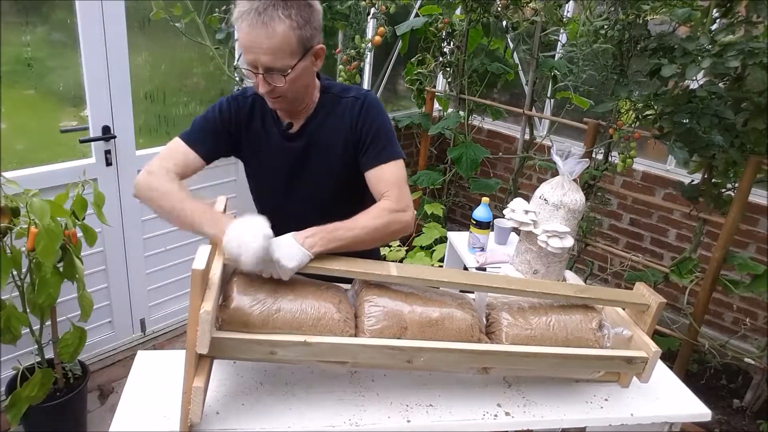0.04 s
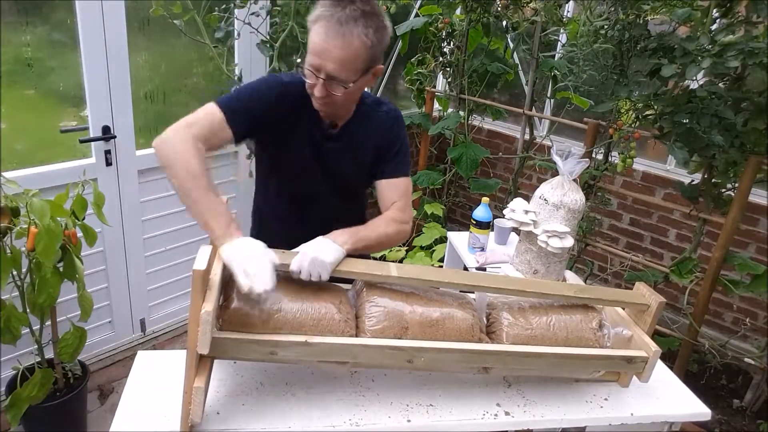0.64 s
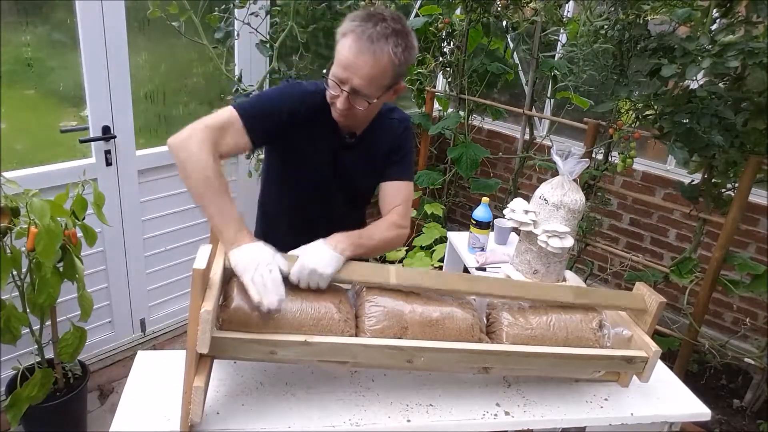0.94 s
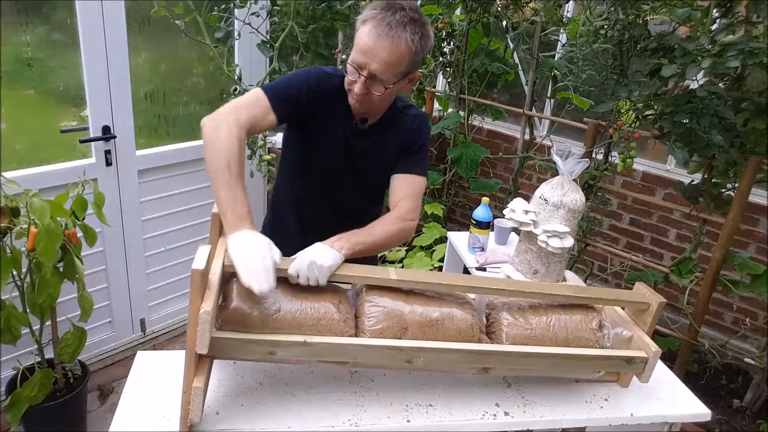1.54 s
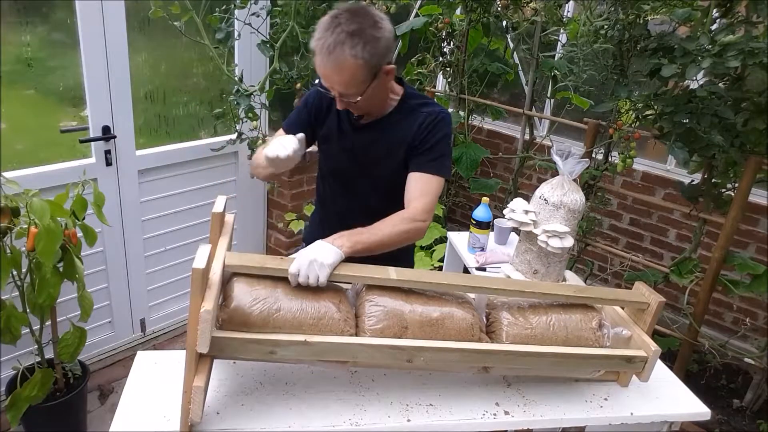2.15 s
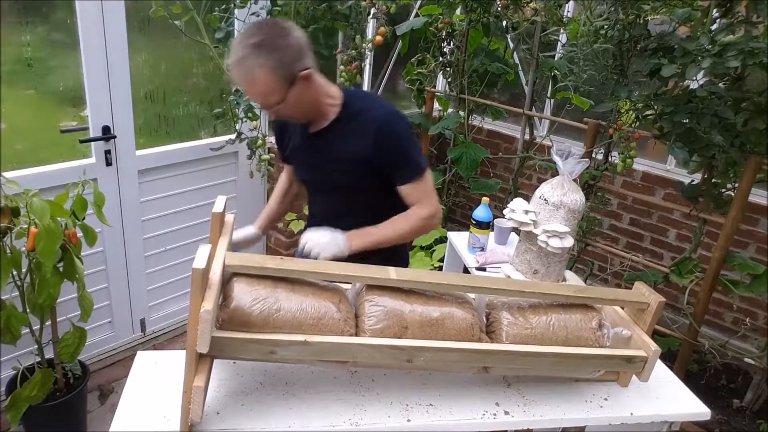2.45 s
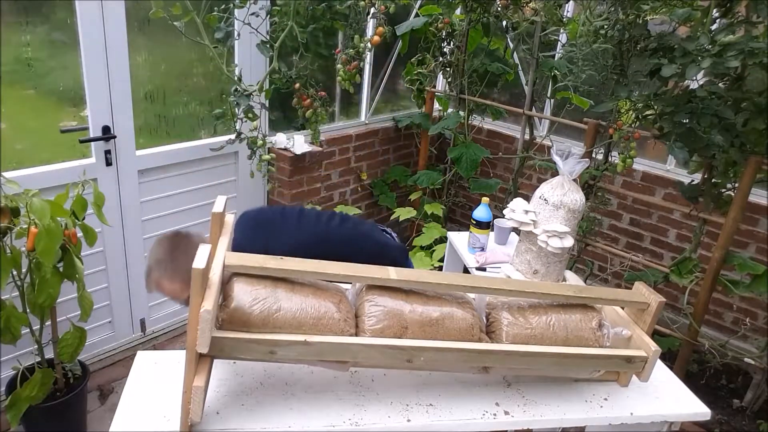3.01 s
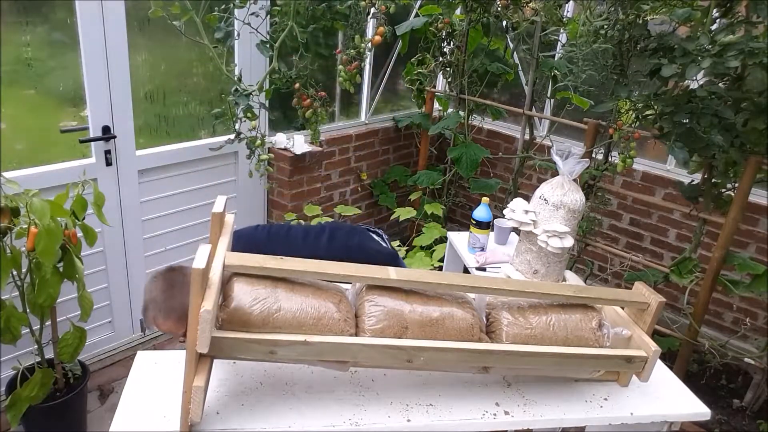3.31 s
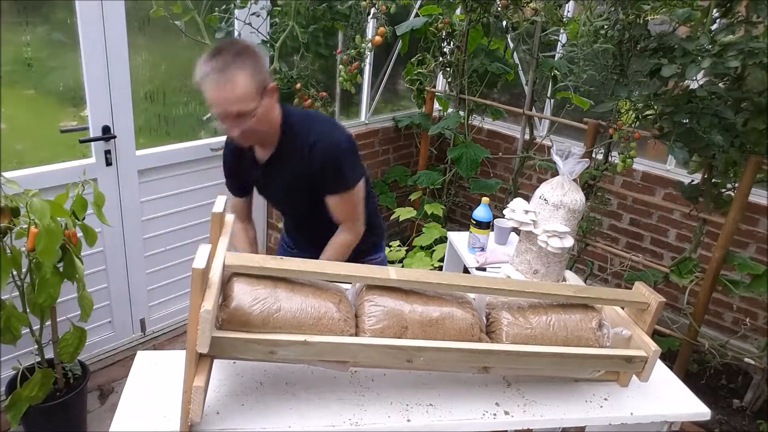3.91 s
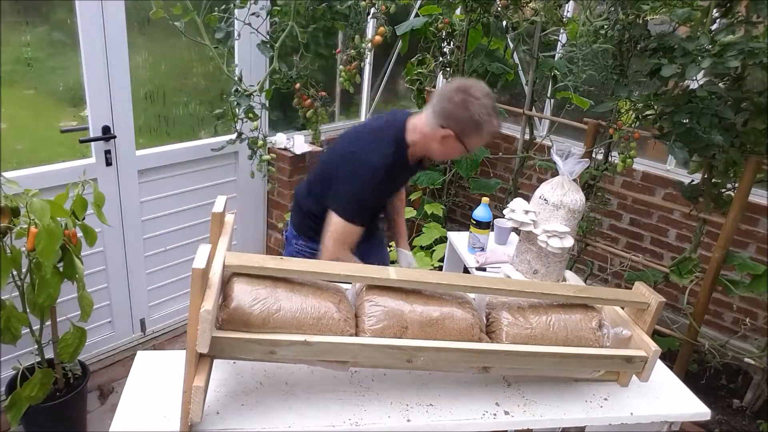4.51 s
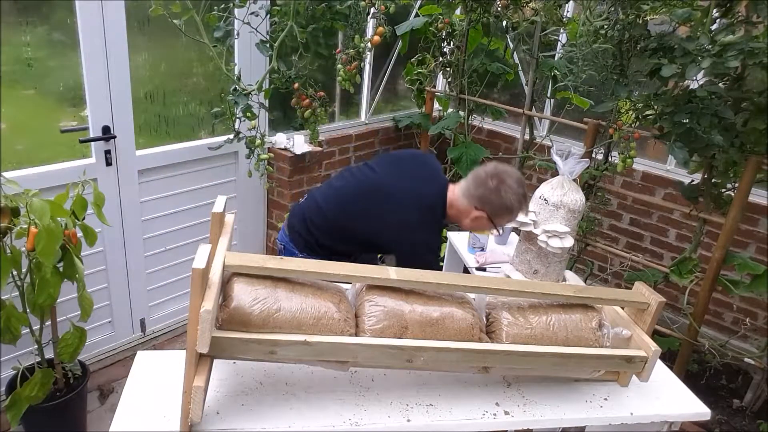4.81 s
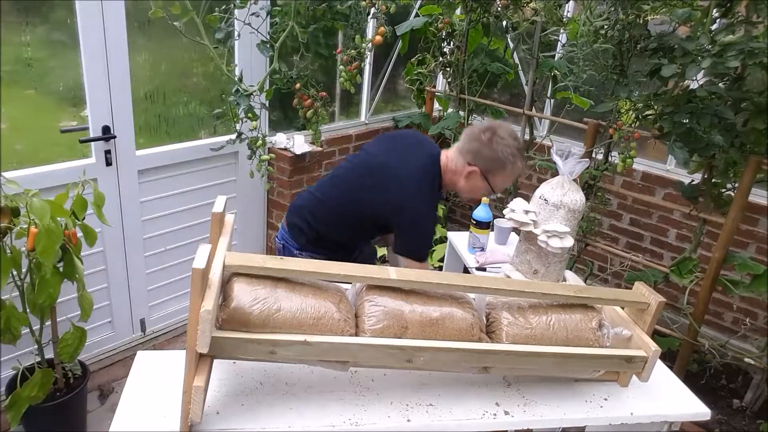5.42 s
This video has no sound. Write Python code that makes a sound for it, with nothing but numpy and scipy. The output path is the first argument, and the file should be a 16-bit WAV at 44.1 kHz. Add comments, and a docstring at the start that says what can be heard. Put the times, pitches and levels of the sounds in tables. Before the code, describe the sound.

Several quick, hollow knocks on wood ring in a greenhouse, then clothes rustle and things are moved with light bumps and a scrape.

```python
"""The ring of an earlier knock fades on a wooden frame on a table in a small, ringing greenhouse.
Until about 2 s a gloved hand knocks, ringing wood and room, among dry ticks and light clicks.
The glove then slides off; clothes and shoes shuffle as the worker bends down.
From 3.4 s things are moved beside the table: faint bumps, a metal chink (4.9 s),
a double bump (5.2 s), last a scrape and a bright clack (5.5 s)."""
import sys
import numpy as np
from scipy import signal
from scipy.fft import irfft, next_fast_len
from scipy.io import wavfile

SR = 44100
rng = np.random.default_rng(int(sys.argv[2]) if len(sys.argv) > 2 else 0)


def dump(signal):
    """Clip the signal to [-1, 1] and save it as 16-bit WAV at the path in sys.argv[1]."""
    limited = np.clip(np.atleast_2d(signal).T, -1, 1)
    pcm = np.round(limited * 32767).astype(np.int16)
    wavfile.write(sys.argv[1], SR, pcm)


N = 249606
TIME = np.arange(N) / SR


def from_db(db):
    return 10 ** (np.asarray(db) / 20)


def unit_rms(x):
    return x / np.sqrt(np.mean(x ** 2) + 1e-20)


def at_hz(points, hz):
    """Table lookup on a log-frequency axis."""
    f, value = np.transpose(points)
    return np.interp(np.log(hz + 1e-6), np.log(f), value)


def add(track, start_s, sound):
    i = int(np.clip(start_s * SR, 0, N - 1))
    track[i:i + len(sound)] += sound[:N - i]


def decay(t60_s, size):
    return np.exp(-np.log(1000) / max(t60_s, 1e-3) * TIME[:size])


def burst(t60_s, rise_s, size):
    """Rise and decay, unit energy."""
    envelope = decay(t60_s, size) * (1 - np.exp(-TIME[:size] / max(rise_s, 1e-5)))
    return envelope / np.sqrt(np.sum(envelope ** 2))


def swell(peak_s, length_s, rise_share, sharpness):
    """Envelope: a triangle raised to a power."""
    start_s = peak_s - rise_share * length_s
    return np.interp(TIME, [start_s, peak_s, start_s + length_s], [0, 1, 0]) ** sharpness


def flutter(rate_hz, depth_db):
    """Randomly wandering gain."""
    knots = rng.standard_normal(2000)
    return from_db(depth_db * np.interp(TIME * rate_hz, np.arange(len(knots)), knots))


def noise(colour_db, size):
    """Unit-RMS noise with spectrum colour_db(hz)."""
    hz = np.fft.rfftfreq(size, 1 / SR) + 1
    phases = np.exp(2j * np.pi * rng.random(len(hz)))
    return unit_rms(irfft(from_db(colour_db(hz)) * phases, size))


def shaped_noise(spectrum):
    return noise(lambda hz: at_hz(spectrum, hz), N)


def resonant_noise(centre_hz, width_oct, size, top_hz=11500):
    """Noise in one resonance, rolled off at the top."""
    def colour_db(hz):
        resonance_db = -25 * np.log10(1 + (np.log2(hz / centre_hz) / width_oct) ** 2 / 3)
        return resonance_db - 10 * np.log10(1 + (hz / top_hz) ** 6)
    return noise(colour_db, size)


def noise_bands(size, count=26):
    """Yields (centre Hz, noise), each band with a unit click's power there."""
    edges_hz = np.geomspace(25, 16500, count + 1)
    white = rng.standard_normal((2, size))
    for k, (low, high) in enumerate(zip(edges_hz, edges_hz[1:])):
        band = signal.sosfilt(signal.butter(2, [low, high], "band", fs=SR, output="sos"), white[k % 2])
        yield np.sqrt(low * high), unit_rms(band) * np.sqrt(2 * (high - low) / SR)


# still air: f/Hz, relative density/dB
AIR_SPECTRUM = [(15, -28.5), (25, 4), (102, -9), (149, 1.5), (190, -10.5), (439, -9), (2280, -18),
                (7110, -19.5), (8830, -26.5), (14800, -22.5), (16000, -39.5)]
def still_air(level_db=-58.5):
    """Steady noise floor."""
    return from_db(level_db) * shaped_noise(AIR_SPECTRUM)


# fading ring of an earlier knock, then strokes of the glove and of dragged things:
# peak t/s, length/s, level/dB, f/Hz, width/oct
TAIL_AND_STROKES = [(0.01, 0.13, -42, 770, 0.47), (0.697, 0.3, -46, 7670, .25), (0.72, 0.3, -45, 1795, .42),
                    (1.838, 0.091, -36.5, 2000, 0.57), (2.423, 0.78, -48, 6540, 0.54),
                    (2.44, .58, -45.5, 2150, 0.33), (2.828, 0.31, -55.5, 1600, .8),
                    (3.323, 0.41, -53, 990, 1.1), (5.443, 0.35, -39.5, 4360, 0.5),
                    (5.458, 0.46, -38, 580, 0.98)]
def knock_tail_and_rubs():
    """A knock's tail fades; then friction swells and fades with each stroke, catching unevenly."""
    out = np.zeros(N)
    for peak_s, length_s, db, hz, width_oct in TAIL_AND_STROKES:
        envelope = from_db(db) * swell(peak_s, length_s, rise_share=0.47, sharpness=2.02)
        out += envelope * resonant_noise(hz, width_oct, next_fast_len(N))[:N]
    return out * flutter(rate_hz=310, depth_db=2)


# room decay: f/Hz, t60/s
ECHO_DECAY = [(80, 0.83), (250, 0.6), (1000, .5), (3000, 0.42), (7500, 0.39), (15000, 0.28)]
# room echo: f/Hz, level/dB
ECHO_LEVEL = [(40, -10), (110, -4), (170, 0), (400, 0.5), (1000, 1), (2500, -2), (7000, -1), (15000, -11)]
def echo(hz, size, build_s=0.0056):
    """Envelope of the diffuse tail off glass and brick at one frequency."""
    return from_db(at_hz(ECHO_LEVEL, hz)) * burst(at_hz(ECHO_DECAY, hz), build_s, size)


def greenhouse(x, wet_db=-5, size=24000):
    """Direct sound plus diffuse tail."""
    tail = sum(band * echo(hz, size) for hz, band in noise_bands(size))
    return x + from_db(wet_db) * signal.fftconvolve(x, tail)[:N]


def pings(events, size=2048):
    """Band-limited damped sines from rows of t/s, level/dB, f/Hz, t60/s."""
    out = np.zeros(N)
    for start_s, db, hz, t60_s in events:
        add(out, start_s, from_db(db) * np.sin(2 * np.pi * hz * TIME[:size]) * decay(t60_s, size))
    thin = signal.sosfilt(signal.butter(2, 1200, "high", fs=SR, output="sos"), out + 1e-18)
    return signal.sosfilt(signal.butter(4, 9000, fs=SR, output="sos"), thin)


# close ticks: t/s, level/dB, f/Hz, release re catch/dB
TICK_PAIRS = [(0.141, -28.5, 4870, 2), (0.1817, -22, 5760, -21), (0.474, -19, 4900, -1),
              (1.083, -16.5, 5200, -3), (4.05, -27.5, 1375, -9.5), (4.0786, -17, 6800, -4)]
def ticks(release_s=0.003, t60_cycles=11.5):
    """Catch and release, too near and faint to excite the room."""
    return pings((start_s + k * release_s, db + k * release_db, hz, t60_cycles / hz)
                 for start_s, db, hz, release_db in TICK_PAIRS for k in (0, 1))


def contact_force(db, weight_db, cutoff_hz, weight_below_hz=585, slope_db_per_oct=11):
    """Blow spectrum (f/Hz, level/dB): weight sets the lows, a soft contact loses the highs."""
    hz = np.geomspace(220, 5500, 12)
    lows_db = weight_db / (1 + (hz / weight_below_hz) ** 3)
    loss_db = slope_db_per_oct * np.log2(1 + (hz / cutoff_hz) ** 4) / 4
    return np.transpose([hz, db + lows_db - loss_db])


# dense weak modes of the frame: f/Hz, density/dB
CRACK_SPECTRUM = [(40, 49.4), (105, 43.6), (160, 42.3), (250, 42.9), (450, 45.2), (700, 43.53),
                  (1200, 35.44), (2000, 33.76), (3000, 27.55), (5000, 24.4), (7400, 28.5), (10000, 19.4),
                  (15000, 9.5)]
# their decay: f/Hz, t60/s
CRACK_DECAY = [(50, 0.29), (300, 0.08), (1500, 0.066), (3000, 0.047), (6000, 0.022)]
def wood_crack(force, boom_hz, give_s, boom_db=7, boom_oct=0.42, stiff_hz=1500, size=24000, direct=6000):
    """Dense modes and their room tail; the struck spot favours one low band."""
    out = np.zeros(size)
    for hz, band in noise_bands(size):
        lift_db = boom_db * np.exp(-(np.log2(hz / boom_hz) / boom_oct) ** 2)
        rise_s = give_s / (1 + (hz / stiff_hz) ** 2)  # highs at once, lows as the wood gives
        power = echo(hz, size) ** 2
        power[:direct] += burst(at_hz(CRACK_DECAY, hz), rise_s, direct) ** 2
        out += from_db(at_hz(force, hz) + at_hz(CRACK_SPECTRUM, hz) + lift_db) * band * np.sqrt(power)
    return out


def ringing(modes, force, rise_s, size):
    """Damped sines, each driven by the force at its frequency."""
    t = TIME[:size]
    tones = np.zeros(size)
    for hz, db, t60_s in modes:
        sine = np.sin(2 * np.pi * (hz * t + rng.random()))
        tones += from_db(at_hz(force, hz) + db) * sine * decay(t60_s, size)
    return tones * (1 - np.exp(-t / rise_s))


# main modes of the frame: f/Hz, level/dB, t60/s
FRAME_MODES = [(223, 0, 0.037), (272, 0, 0.047), (341, -3, 0.1), (488, -5, 0.063), (565, -5, 0.06),
               (785, -4.5, 0.05), (945, -2.5, 0.054), (1120, -7, 0.022), (1407, -6, 0.025),
               (1715, -9, 0.046), (1942, -10, 0.08), (2110, -7.5, 0.11), (2580, -6.5, .025)]
def frame_ring(force, give_s, gain_db=-2.5):
    """The main modes build up as the wood gives."""
    return from_db(gain_db) * ringing(FRAME_MODES, force, give_s, size=6000)


def frame_resonance(cracks, gain_db=-1):
    """The main modes colour the cracks, tails included."""
    out = np.zeros(N)
    for hz, db, t60_s in FRAME_MODES:
        q = np.pi * hz * t60_s / np.log(1000)
        out += from_db(db) * signal.lfilter(*signal.iirpeak(hz, q, fs=SR), cracks + 1e-18)
    return from_db(gain_db) * out


# greenhouse modes: f/Hz, level/dB, t60/s
ROOM_MODES = [(79, -14, 0.74), (155.05, 0.5, 0.43), (207.2, -5, 0.41), (231.8, -11, .58),
              (264.5, -7.5, 0.66), (346.7, -6, 0.51), (431, -11, 0.28), (483.4, -13, 0.62)]
def standing_waves(force):
    """Low room tones ring on after a blow."""
    return ringing(ROOM_MODES, force, rise_s=0.0075, size=24000)


# hand on the frame: t/s, level/dB, weight/dB, cutoff/Hz, boom/Hz, give/s
HAND_KNOCKS = [(0.2201, -21, 0, 4000, 160, 0.0058), (0.4873, -21, 2, 2860, 186, 0.0015),
               (0.802, -10.5, -5.5, 6960, 238, 0.00091), (0.899, -25.5, -7.5, 5340, 293, 0.0014),
               (1.1221, -8, -5.5, 3780, 316, 0.00052), (1.646, -18, -10.5, 3820, 254, .009),
               (1.811, -36, -9.5, 3000, 406, .001), (2.033, -25.5, -6.5, 3900, 150, 0.0048)]
# things bumped beside the frame: t/s, level/dB, cutoff/Hz, boom/Hz
SIDE_BUMPS = [(3.41, -46, 1400, 257), (3.79, -51.5, 903, 303), (4.195, -42.5, 583, 431),
              (5.214, -22.5, 590, 250), (5.2628, -28, 5300, 256)]
def blows(knock_ring_db=0.9, bump_ring_db=-3.5, bump_weight_db=-5.5, bump_give_s=0.0035):
    """Each blow cracks and rings frame and room; bumps ring them less."""
    knocks = [(start_s, contact_force(db, weight_db, cutoff_hz), boom_hz, give_s, knock_ring_db)
              for start_s, db, weight_db, cutoff_hz, boom_hz, give_s in HAND_KNOCKS]
    bumps = [(start_s, contact_force(db, bump_weight_db, cutoff_hz), boom_hz, bump_give_s, bump_ring_db)
             for start_s, db, cutoff_hz, boom_hz in SIDE_BUMPS]
    cracks, tones = np.zeros((2, N))
    for start_s, force, boom_hz, give_s, ring_db in knocks + bumps:
        add(cracks, start_s, wood_crack(force, boom_hz, give_s))
        add(tones, start_s, from_db(ring_db) * frame_ring(force, give_s))
        add(tones, start_s, from_db(ring_db) * standing_waves(force))
    return cracks + frame_resonance(cracks) + tones


# small hard things touched and set down: t/s, level/dB, f/Hz, width/oct, t60/s
HARD_CONTACTS = [(0.4862, -18, 6400, 0.27, 0.02), (0.642, -29.5, 9000, 2.3, 0.01),
                 (0.6523, -26.5, 8000, 1.3, 0.013), (2.76, -44.5, 6700, .5, 0.039),
                 (2.781, -32.5, 5100, 0.31, 0.044), (3.029, -46, 4360, 0.47, .02),
                 (3.342, -35.5, 5270, 0.32, .041), (3.41, -37.5, 4940, 0.74, .078),
                 (3.756, -43.5, 3930, 0.29, 0.051), (4.337, -41, 7400, 0.23, .012),
                 (4.848, -44, 6990, 0.24, .02), (5.093, -39.5, 4340, 0.49, 0.031),
                 (5.465, -19, 3890, 0.26, 0.089), (5.467, -23, 6820, 0.12, .095)]
def clicks(echo_db=-6, size=16384):
    """A short burst in one resonance, then its room tail."""
    out = np.zeros(N)
    for start_s, db, hz, width_oct, t60_s in HARD_CONTACTS:
        direct = decay(t60_s, size)
        tail = from_db(echo_db) * np.sqrt(np.sum(direct ** 2)) * echo(hz, size)
        add(out, start_s, from_db(db) * resonant_noise(hz, width_oct, size) * np.hypot(direct, tail))
    return out


# footing, shuffling, cloth: f/Hz, relative density/dB
FEET_SPECTRUM = [(25, 5.5), (70, 4), (130, -7.5), (250, -40)]
SHUFFLE_SPECTRUM = [(90, -7), (160, -8.5), (230, 4), (340, 0.5), (520, -1.5), (1100, -8.5), (2300, -13),
                    (3500, -35), (7000, -33.5)]
CLOTH_SPECTRUM = [(1500, -42.5), (3500, 10.5), (5500, 7.5), (7500, 13.5), (10000, -17), (16000, -29)]
# worker lets go, bends, reaches, rises, steps, bends: peak t/s, length/s, effort/dB, feet/dB, cloth/dB
BODY_MOVES = [(2.377, 0.56, -38.5, -14, -1), (2.815, 0.28, -49.5, -2, -3), (3.061, 0.15, -54.5, -1.5, -2),
              (3.36, 0.35, -50.5, -12, -1), (3.804, 0.25, -50.5, 0.5, -12), (4.371, 0.46, -49, 5.5, -3.5),
              (4.686, 0.24, -63.5, -11, 10), (4.903, 0.17, -48.5, -22, 1), (5.104, 0.21, -54, -13, 5)]
def shoes_and_clothes(shuffle_gain_db=-2.5, cloth_gain_db=-8, feet_lead_s=0.076):
    """One swell of effort drives each move; the weight shifts before the body follows."""
    feet, shuffle, cloth = np.zeros((3, N))
    for peak_s, length_s, db, feet_db, cloth_db in BODY_MOVES:
        effort = from_db(db) * swell(peak_s, length_s, rise_share=0.42, sharpness=0.83)
        feet += from_db(feet_db) * np.interp(TIME + feet_lead_s, TIME, effort)
        shuffle += effort
        cloth += from_db(cloth_db) * effort
    feet *= shaped_noise(FEET_SPECTRUM)
    shuffle *= from_db(shuffle_gain_db) * shaped_noise(SHUFFLE_SPECTRUM)
    shuffle *= flutter(rate_hz=58, depth_db=4)
    cloth *= from_db(cloth_gain_db) * shaped_noise(CLOTH_SPECTRUM)
    return feet + shuffle + cloth


def metal_chink(start_s=4.902, db=-24.5, hz=7450, t60_s=0.0047, bounce_s=0.014, loss_db=2):
    """A small metal piece chatters and settles."""
    return pings((start_s + k * bounce_s, db - k * loss_db, hz, t60_s) for k in range(3))


def scene():
    """All sources reach one point; both channels alike."""
    impacts = ticks() + blows() + clicks() + metal_chink()
    sound = impacts + greenhouse(knock_tail_and_rubs() + shoes_and_clothes()) + still_air()
    return np.array([sound, sound])


def gain_control(x, threshold_db=-15.5, cut_share=0.38, attack_s=0.0088, release_db_per_s=70.5):
    """Gain drops on a loud blow and recovers during its tail."""
    pole = np.exp(-1 / (attack_s * SR))
    level_db = 10 * np.log10(signal.lfilter([1 - pole], [1, -pole], x[0] ** 2) + 1e-12)
    cut_db = cut_share * np.maximum(level_db - threshold_db, 0)
    recovery_db = release_db_per_s * TIME
    return x * from_db(recovery_db - np.maximum.accumulate(cut_db + recovery_db))


def record(dry):
    """Gain control, soft clip, 16 kHz low-pass."""
    held = gain_control(dry)
    rounded = held / (1 + held ** 4) ** .25
    return signal.sosfilt(signal.ellip(10, .1, 80, 16000, fs=SR, output="sos"), rounded)


dry = scene()
out = record(dry)
dump(out)
```